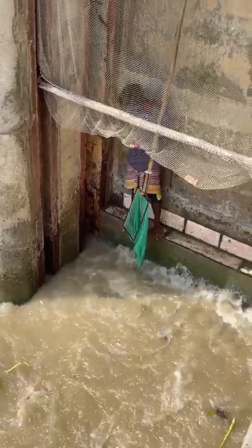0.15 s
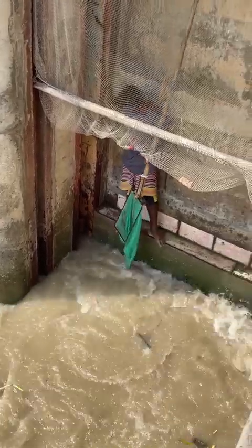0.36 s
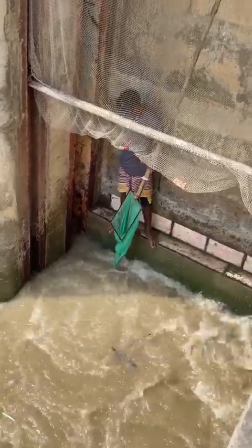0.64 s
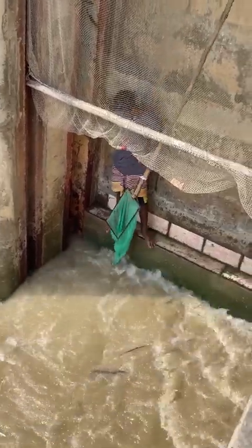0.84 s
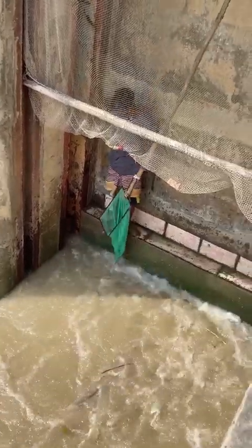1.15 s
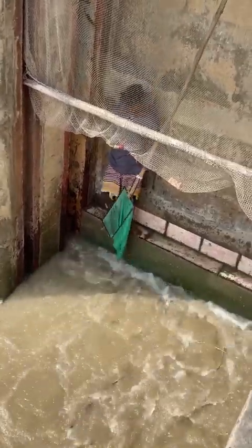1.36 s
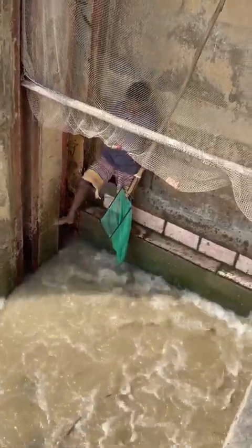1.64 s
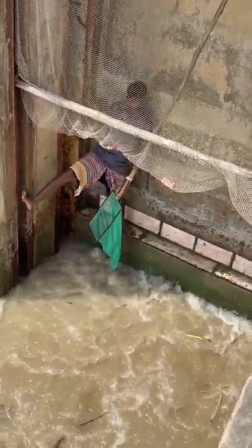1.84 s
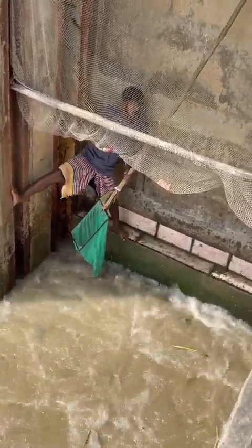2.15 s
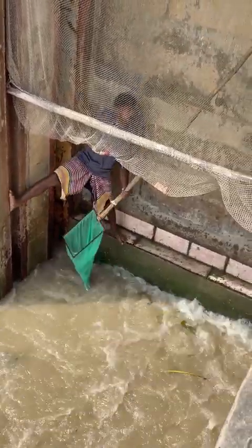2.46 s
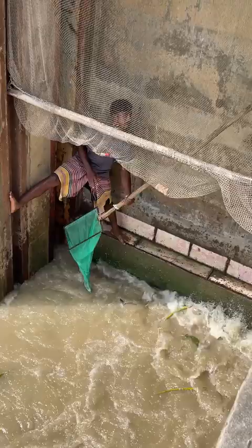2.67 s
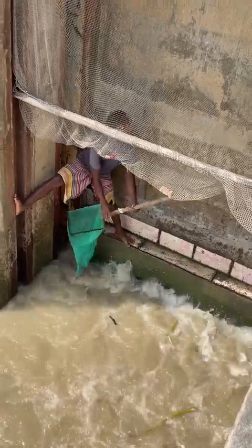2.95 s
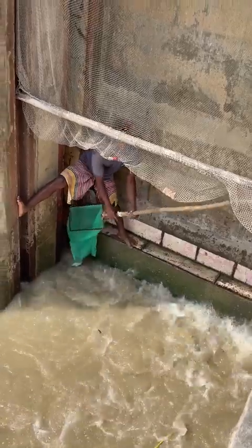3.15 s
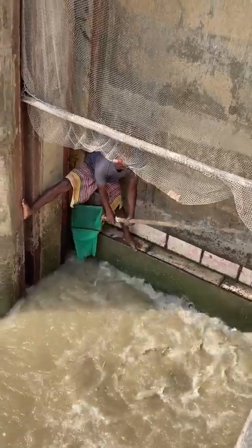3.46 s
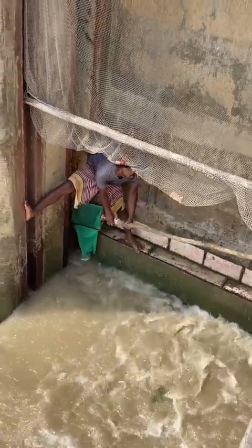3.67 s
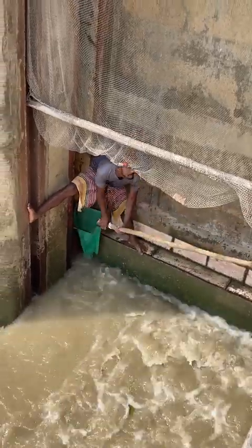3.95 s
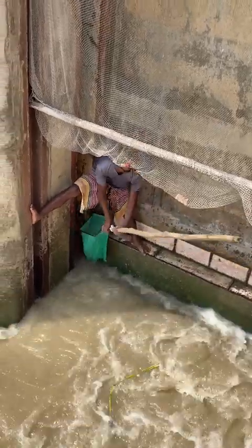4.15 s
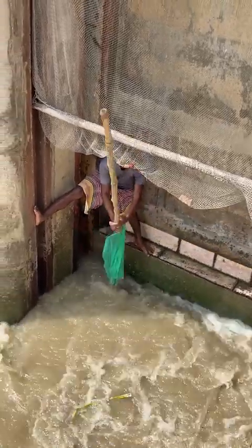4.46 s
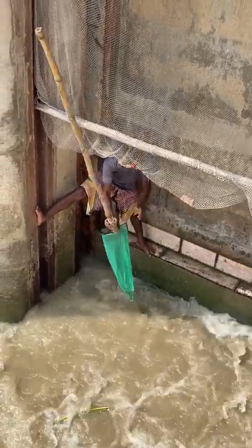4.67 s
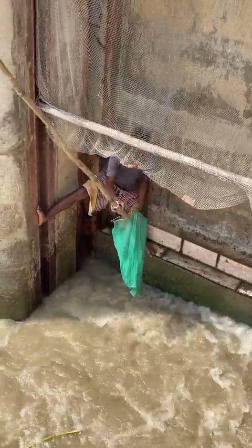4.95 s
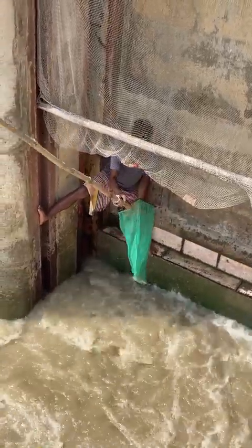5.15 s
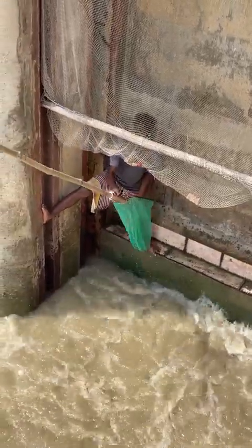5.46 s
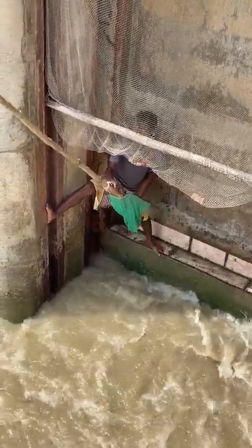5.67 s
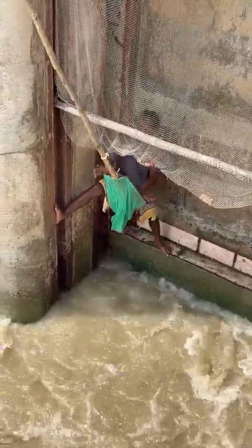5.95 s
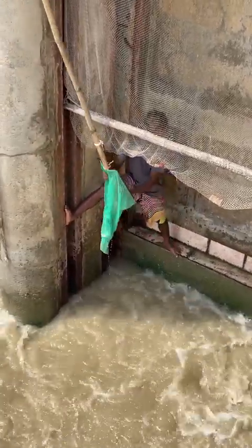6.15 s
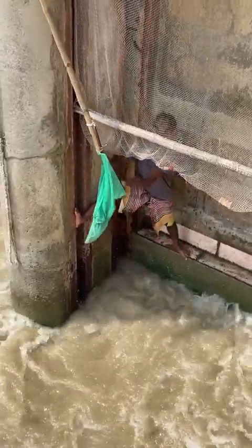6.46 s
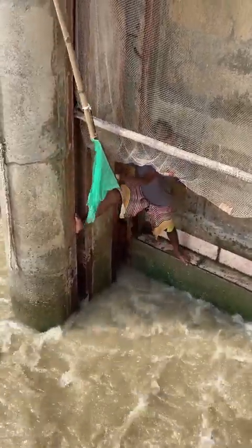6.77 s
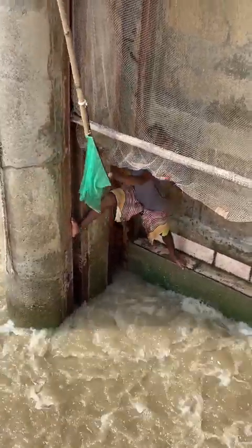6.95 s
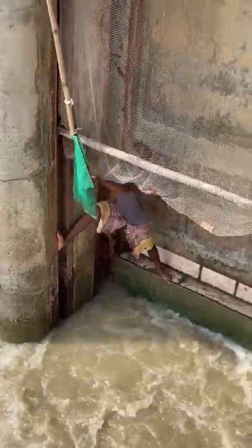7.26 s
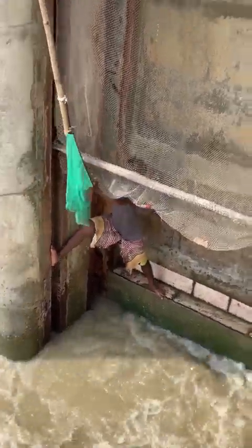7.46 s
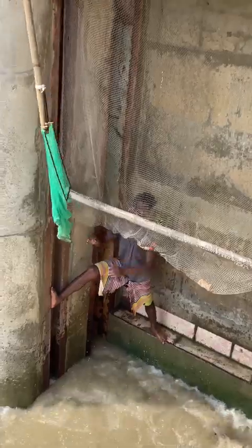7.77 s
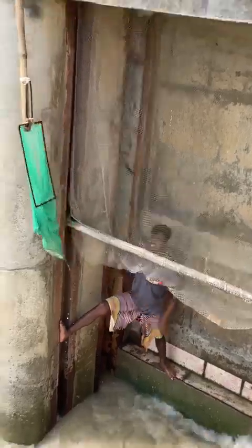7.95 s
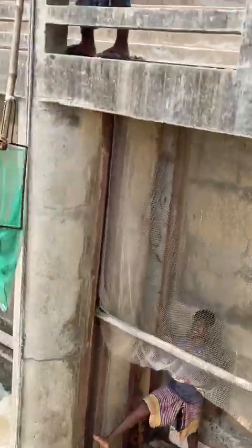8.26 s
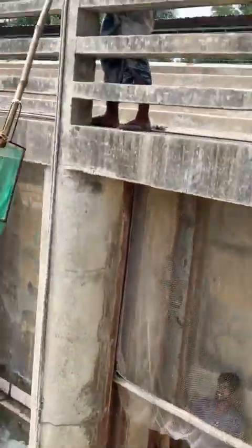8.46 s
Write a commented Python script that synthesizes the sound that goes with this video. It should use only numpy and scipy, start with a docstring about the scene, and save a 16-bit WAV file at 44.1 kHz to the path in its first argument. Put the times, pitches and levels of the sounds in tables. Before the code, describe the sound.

Muddy water rushes loudly and steadily through a concrete sluice bay, with low booming boils, hollow gulps, soft thuds and splashes.

```python
"""Rush of muddy water under a sluice gate

Muddy water boils up from under the gate and rushes through a concrete bay, heard from above.
Filtered noise and swarms of ringing bubbles make the rush; boils of trapped air add a low boom.
Air pockets gulp and slugs of water thud as short ringing tones; splashes and two ticks are showers
of tiny impacts. Left and right differ by band, as a joint-stereo audio coder leaves them.
"""
import sys
import numpy as np
from scipy import signal
from scipy.fft import rfft, irfft
from scipy.io import wavfile
from scipy.ndimage import uniform_filter1d

SR = 44100
rng = np.random.default_rng(int(sys.argv[2]) if len(sys.argv) > 2 else 0)


def to_wav(s):
    """Save 16-bit WAV."""
    ch = np.atleast_2d(s).T  # columns
    pcm = np.round(np.clip(ch, -1, 1) * 32767)  # PCM
    wavfile.write(sys.argv[1], SR, pcm.astype(np.int16))


N = 379906  # length in samples
BINS_HZ = np.fft.rfftfreq(N, 1 / SR)


def amp(db):
    """Turns decibels into a gain."""
    return 10 ** (np.asarray(db) / 20)


def unit(x):
    """Scales a signal to an rms of 1."""
    return x / np.sqrt(np.mean(x ** 2) + 1e-20)


def read(points, hz):
    """Reads a table of (pitch_hz, value) between its points, with pitch on a log scale."""
    table_hz, value = np.transpose(points)
    return np.interp(np.log(hz + 1), np.log(table_hz + 1), value)


def add(mix, start_s, sound):
    """Adds a sound into the mix, starting at the given time."""
    part = mix[max(round(start_s * SR), 0):][:len(sound)]
    part += sound[:len(part)]


def smooth_noise(shape, cells):
    """Random values with an rms of 1, averaged twice over neighbouring cells along axis 1."""
    field = rng.standard_normal(shape)
    for _ in range(2):
        field = uniform_filter1d(field, max(round(cells), 1), 1, mode="wrap")
    return unit(field)


def random_sway(count, seconds):
    """A level that wanders at random over the whole scene, in bumps about this long."""
    return smooth_noise((1, count), seconds * SR / N * count)


def bell(hz, centre_hz, octaves):
    """A smooth hump around one pitch, on a scale of octaves."""
    return np.exp(-.5 * (np.log2((hz + 1) / centre_hz) / octaves) ** 2)


def bubble(hz, t60, rise, swell_cycles):
    """A bubble rings and falls 60 dB in t60 seconds; its pitch climbs as it nears the surface."""
    t = np.arange(int(t60 * SR) + 2) / SR
    onset = 1 - np.exp(-t * hz / swell_cycles)
    decay = np.exp(-np.log(1000) * t / t60)
    return onset * decay * np.sin(2 * np.pi * hz * t * (1 + rise * t / t60))


def bubbles(low_hz, high_hz, per_s, cycles, spread_db, count=48):
    """A swarm of bubbles of many sizes, with about equal energy in every hertz."""
    out = np.zeros(N)
    per_size = int(per_s * N / SR / count)
    for hz in np.geomspace(low_hz, high_hz, count) * rng.uniform(.97, 1.03, count):
        ring = bubble(hz, cycles / hz, rise=0.07, swell_cycles=0.29)
        ring *= np.sqrt(hz) / np.linalg.norm(ring)
        when, size, sign = rng.random((3, 2000))[:, :per_size]
        # most bubbles are near the weakest, a few are much stronger
        extra_db = spread_db * np.minimum(-np.log(1 - size), 4)
        strength = amp(extra_db) * np.sign(sign - .5)
        at = (when * N).astype(int)[:, None] + np.arange(len(ring))
        out += np.bincount(at.ravel(), (strength[:, None] * ring).ravel(), N)[:N]
    return unit(out)


def bursts(rows, grains_per_s):
    """Short showers of tiny impacts that rise quickly and die away more slowly, each in its own band."""
    fall = 2.25  # dies away this many times more slowly than it rises
    length = SR // 2
    out, hz = np.zeros(N), np.fft.rfftfreq(length, 1 / SR)
    t = np.arange(length) / SR - 1 / 4  # zero at the crest
    for crest_s, level_db, centre_hz, octaves, rise_s in rows:
        grains = rng.standard_normal(length) * (rng.random(length) < grains_per_s / SR)
        shape = np.exp(-2 * (t / np.where(t < 0, rise_s, rise_s * fall)) ** 2)
        shower = irfft(rfft(grains) * bell(hz, centre_hz, octaves), length) * shape
        shower = unit(shower) * np.sqrt(np.mean(shape ** 2))
        out += np.interp(np.arange(N) / SR, crest_s + t, amp(level_db) * shower, 0, 0)
    return out


def ticks():
    """Small sharp ticks: very dense, very short showers of impacts."""
    # each tick: crest_s, level_db (rms around the crest), centre_hz, width_octaves, rise_s
    tick_rows = [(8.166, -31, 7000, 0.29, 0.0027), (8.18, -37, 7700, .32, 0.0026)]
    return bursts(tick_rows, grains_per_s=15000)


def splashes():
    """Crests break and slap down as a patter of separate drops."""
    # each splash: crest_s, level_db (rms around the crest), centre_hz, width_octaves, rise_s
    splash_rows = [(.135, -20, 760, 0.47, 0.06), (.165, -30, 2200, .45, 0.034),
                   (.255, -23, 950, 0.41, 0.016), (1.07, -24, 1200, .5, .015), (1.8, -40, 2600, .7, 0.023),
                   (1.965, -33, 4000, 0.65, 0.02), (2.56, -26, 650, 0.3, .025),
                   (2.635, -25, 950, 0.28, .035), (3.13, -22.5, 740, .62, 0.088),
                   (3.155, -33, 5200, .3, .012), (3.23, -27, 1400, 0.53, 0.019),
                   (3.455, -20.5, 800, 0.92, 0.022), (4.066, -28, 3400, .14, .022),
                   (4.066, -24, 1900, .3, .012), (4.223, -31, 3400, .45, 0.016),
                   (4.455, -23, 850, 0.46, 0.024), (4.485, -28.5, 4000, .4, 0.014),
                   (4.659, -25, 3100, .4, .007), (4.705, -35, 3700, .3, .012),
                   (5.015, -23, 1000, 0.8, 0.038), (5.095, -23, 1000, .72, 0.0099),
                   (5.19, -25, 900, 0.45, 0.0065), (5.28, -33, 2500, .39, .035),
                   (6.42, -21, 1690, 0.36, .008), (6.435, -21, 620, 0.49, 0.015),
                   (6.535, -31, 4700, .44, .025), (7.808, -24, 950, 0.22, .014),
                   (8.03, -23, 620, .41, 0.048), (8.06, -31, 4500, .5, .022)]
    return bursts(splash_rows, grains_per_s=2500)


def thuds():
    """Slugs of water knock under the gate: a few low, quickly damped cycles each."""
    # each slug of water: start_s, pitch_hz, peak_db
    thud_rows = [(.14, 60, -15), (0.209, 150, -22), (.245, 95, -20), (.462, 106, -21), (0.596, 108, -19),
                 (.772, 108, -20), (1.07, 91, -19), (1.329, 108, -21), (2.667, 100, -20), (2.75, 98, -24),
                 (3.152, 62, -21), (3.29, 86, -15), (3.365, 125, -17), (3.771, 85.5, -20), (4.228, 65, -22),
                 (5.198, 96, -19), (5.335, 69.7, -19), (5.642, 97, -17), (5.673, 85.5, -21),
                 (6.003, 75, -21), (6.113, 65, -21), (6.295, 104, -20), (6.35, 65, -22), (6.518, 86, -21),
                 (7.372, 117, -20), (7.975, 70, -26)]
    out = np.zeros(N)
    for start_s, hz, peak_db in thud_rows:
        knock = bubble(hz, t60=0.086, rise=0, swell_cycles=1.5)
        add(out, start_s, amp(peak_db) * knock / abs(knock).max())
    return out


def gulps():
    """Air pockets swell over a few cycles and ring as they break loose, the larger the lower."""
    # each air pocket: start_s, pitch_hz (at the start), peak_db, ring_s (to fall 60 dB)
    gulp_rows = [(.945, 193, -24, 0.2), (1.032, 1217, -19, 0.079), (1.31, 334, -25, .13),
                 (1.791, 392, -18, .11), (2.185, 535, -23, .13), (2.735, 193, -16, .14),
                 (2.78, 267, -17, .11), (2.868, 207, -17, 0.13), (2.908, 236, -20, 0.27),
                 (3.025, 554, -16, .078), (3.145, 178, -13.5, .13), (3.228, 228, -16, .16),
                 (3.285, 361, -17.5, 0.091), (3.705, 1570, -20, .076), (4.275, 159, -21, 0.16),
                 (4.28, 509, -21.5, 0.11), (4.503, 163, -20.5, 0.17), (4.94, 314, -18, .12),
                 (4.98, 201, -22.5, 0.54), (5.07, 282, -19.5, .18), (5.085, 788, -17.5, .09),
                 (5.18, 215, -16.5, 0.12), (5.345, 539, -19, 0.13), (5.527, 1300, -19.5, .061),
                 (5.656, 512, -20, .1), (5.79, 226, -13.5, 0.25), (6.14, 357, -17, .15),
                 (6.444, 394, -19, .15), (6.53, 377, -18.5, 0.14), (6.703, 1920, -25, 0.066),
                 (7.085, 137, -22, 0.13), (7.595, 563, -26, .13), (7.815, 986, -21, 0.087),
                 (8.003, 570, -20.5, .12), (8.02, 278, -18, 0.16), (8.452, 542, -26, 0.14)]
    out = np.zeros(N)
    for start_s, hz, peak_db, ring_s in gulp_rows:
        ring = bubble(hz, ring_s, rise=0.03, swell_cycles=4.3)
        add(out, start_s, amp(peak_db) * ring / abs(ring).max())
    return out


def boils(t):
    """Power of the boom as boils of trapped air burst up under the gate, against a steady rush of 1."""
    # each boil: crest_s, boom_db (over the steady rush, at the lowest pitches), rise_s
    boil_rows = [(0.0, 8.5, 0.029), (.14, 8, 0.059), (.23, 6.5, 0.054), (.5, 1, 0.11), (.7, 2.5, 0.028),
                 (.97, 5.5, 0.022), (1.12, 6.5, 0.026), (1.33, 3, 0.033), (1.62, 2, 0.028), (1.8, 7, .028),
                 (1.96, 4.5, 0.017), (2.13, -2, 0.053), (2.555, 6.5, .023), (2.65, 5.5, 0.042),
                 (2.76, 9, 0.039), (2.915, 8.5, 0.03), (3.03, 5.5, 0.043), (3.14, 7, 0.049),
                 (3.225, -4, 0.016), (3.3, 6, 0.035), (3.45, 6.5, 0.041), (3.81, 3, 0.05), (4.51, -0.5, .1),
                 (5.2, 1, .033), (5.36, 1, .05), (5.5, 2.5, 0.068), (5.68, 6, 0.056), (5.83, -1, 0.036),
                 (5.92, 3.5, 0.016), (6.15, 2.5, 0.021), (6.25, 2, 0.021), (6.43, 2, 0.033),
                 (6.57, 4, 0.12), (6.77, -17, .036), (7.09, 5, 0.091), (7.32, -2, 0.087), (7.86, 5, 0.046),
                 (8.01, 4, 0.06), (8.17, 4, 0.092), (8.47, -3, 0.081)]
    fall = 2.14  # dies away this many times more slowly than it rises
    power = 0
    for crest_s, boom_db, rise_s in boil_rows:
        duration_s = np.where(t < crest_s, rise_s, rise_s * fall)
        power = power + amp(boom_db) ** 2 * np.exp(-((t - crest_s) / duration_s) ** 2)
    return power


def swell(hz, t):
    """Level in dB by pitch and time: the flow lifts everything, boils add boom, froth stirs the hiss."""
    # strength of the flow through the gate: time_s, level_db (only its changes count)
    flow_points = [(0.0, -3.5), (0.15, -.3), (1.55, -2.5), (1.85, -2.1), (2.45, -5.5), (2.6, -3),
                   (2.95, -2.5), (3.17, 0.5), (3.65, -1.5), (3.95, 0), (4.25, -2.5), (5.05, 0.5),
                   (5.4, 0.1), (5.65, -2.7), (6.28, -1.4), (6.5, 0.8), (7.45, -1.7), (8.08, -1.9),
                   (8.61, -2.5)]
    slosh_per_s, slosh_crest_s, slosh_db = 2.03, .17, 0.08  # water sways between the walls
    flow_db = np.interp(t, *np.transpose(flow_points))
    flow_db = flow_db + slosh_db * np.cos(2 * np.pi * slosh_per_s * (t - slosh_crest_s))
    # dB of change per dB of flow: rumble follows the flow less than foam hiss does
    follow = read([(100, 0.77), (10000, 1)], hz)[:, None]
    # big air pockets sound low: the boom fades above 442 Hz
    low = 1 / (1 + (hz[:, None] / 442) ** 3.7)
    boom_db = 10 * np.log10(1 + low * boils(t))
    lumps_db = 0.77 * random_sway(len(t), seconds=0.12)
    # patches of froth collapse at random and sway all the hiss together
    froth_db = 0.67 * random_sway(len(t), seconds=0.052)
    level_db = follow * flow_db + boom_db + low * lumps_db + (1 - low) * froth_db
    return level_db - level_db.mean(1, keepdims=True)


def late_dulling(hz, t):
    """Level in dB by pitch and time: the midrange dulls slightly near the end."""
    dull_s, dull_length_s, dull_db = 8.0, 0.2, -1.5
    band = bell(hz, centre_hz=1700, octaves=.6)
    return dull_db * band[:, None] * np.clip((t - dull_s) / dull_length_s, 0, 1)


def bay_and_colour():
    """Gain by pitch: the colour of the rush, with the air between gate and walls boosting or muting bands."""
    # colour of the rushing water: pitch_hz, level_db (per hertz, relative)
    rush_colour = [(20, -23.3), (38, -18), (60, -2.5), (280, -3.5), (460, -6.5), (680, -5.5), (1300, -10.5),
                   (2050, -14.5), (2700, -17.5), (4000, -21), (5500, -21.5), (8000, -27.5), (10500, -31.5),
                   (13000, -35), (15500, -34.5)]
    # resonances and nulls of the air in the bay: pitch_hz, width_hz, boost_db
    bay_rows = [(62.6, 8.7, 3.5), (82, 11, -3), (97, 17, 5), (117.6, 6.5, -3.5), (149, 8.8, 4),
                (179, 18, -1.5), (197, 10, 4.5), (226.6, 8.6, 4.5), (274, 24, 2), (346, 84, 2),
                (565, 54, 2), (700, 84, 1.35), (1320, 150, 0.5)]
    level_db = read(rush_colour, BINS_HZ)
    for hz, width_hz, boost_db in bay_rows:
        level_db = level_db + boost_db / (1 + (2 * (BINS_HZ - hz) / width_hz) ** 2)
    return amp(level_db)


def water():
    """Wash, bubbles and spray, swelling with the flow; rows are the main sound and a stereo side noise."""
    wash = rng.standard_normal((2, N))
    # bubble levels in dB are against the noise of the wash
    gurgles = bubbles(220.4, 1508, per_s=260, cycles=49.0, spread_db=1.0)
    wash[0] += amp(-18.5) * gurgles
    # middle-sized bubbles pop at the surface, in clusters
    cluster_db = 1.5 * np.clip(random_sway(N, seconds=0.074)[0], -2, 2)
    plops = bubbles(652, 2597, per_s=130, cycles=69, spread_db=1.2)
    wash[0] += amp(-19.5) * unit(amp(cluster_db) * plops)
    fizz = bubbles(1745, 14100, per_s=2600, cycles=10.8, spread_db=1.0)
    wash[0] += amp(-8.0) * fizz

    hz, t, spectrum = signal.stft(wash, SR, nperseg=512, noverlap=384)
    swell_db = swell(hz, t) + late_dulling(hz, t)
    # wavelets flicker in narrow bands across all pitches, afresh in every 3 ms frame and in each row; a second,
    # weaker flicker of the same kind adds to it
    wavelet_db = 1.23 * smooth_noise(spectrum.shape, cells=2)
    more_flicker_db = 0.63 * smooth_noise(spectrum.shape, cells=2)
    spectrum = spectrum * amp(swell_db + wavelet_db + more_flicker_db)
    flow = signal.istft(spectrum, SR, nperseg=512, noverlap=384)[1][:, :N]
    coloured = irfft(rfft(flow) * bay_and_colour(), N)
    return amp(-19) * unit(coloured)


def stereo_bands(main, side):
    """Sets stereo coherence, phase and balance by band, as a joint-stereo audio coder leaves them."""
    # stereo coherence by band: pitch_hz, coherence (0 to 1)
    coherence_points = [(130, 1.0), (380, 0.96), (900, 0.92), (1300, 0.99), (2050, 0.99), (2450, 0.75),
                        (2950, 0.7), (3650, 0.89), (4550, 0.68), (4750, 1.0), (5420, 0.99), (5600, 0.77),
                        (6350, 0.58), (7100, 1.0), (9600, 1.0), (10150, 0.61), (11100, 0.93), (12000, 0.6),
                        (12250, 1.0), (13000, 1.0), (13700, 0.37), (15000, 0.74)]
    # left-right phase by band: pitch_hz, phase_radians (how far right lags left)
    phase_points = [(120, -0.0), (380, -0.35), (800, -0.37), (1300, -0.01), (2100, 0.05), (2500, 0.9),
                    (3750, 0.19), (4550, 0.81), (4720, 0.01), (5420, 0.01), (7050, 3.13), (8200, 3.17),
                    (8330, 6.27), (9600, 6.29), (10150, 7.11), (11100, 6.35), (12000, 6.91), (12250, 6.29),
                    (13000, 6.29), (14600, 9.41)]
    # level of left over right: pitch_hz, difference_db
    balance = [(130, 0), (230, 1.3), (560, 2.2), (800, 1.6), (1200, 0)]
    coherence = np.clip(read(coherence_points, BINS_HZ), 0, 1)
    common = rfft(main) * np.sqrt((1 + coherence) / 2)
    apart = rfft(side) * np.sqrt((1 - coherence) / 2)
    lean = amp(read(balance, BINS_HZ) / 2)
    lag = np.exp(-1j * read(phase_points, BINS_HZ))
    left = (common + apart) * lean
    right = (common - apart) * lag / lean
    return irfft(np.array([left, right]), N)


def scene():
    """The rush with its gulps, thuds and splashes, and two ticks that are equal in left and right."""
    main, side = water()
    main = main + gulps() + thuds() + splashes()
    return stereo_bands(main, side) + ticks()


def record(dry):
    """The recorder's band limit: a steep filter removes what lies above about 15.75 kHz."""
    lowpass = signal.firwin(801, 15750, window=("kaiser", 9), fs=SR)
    return signal.oaconvolve(dry, lowpass[None], "same")


dry = scene()
out = record(dry)
to_wav(out)
```